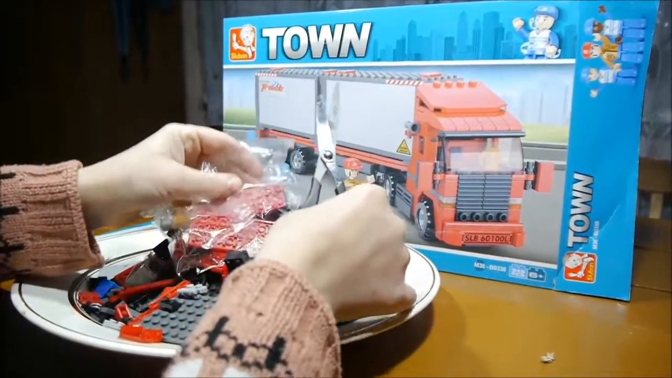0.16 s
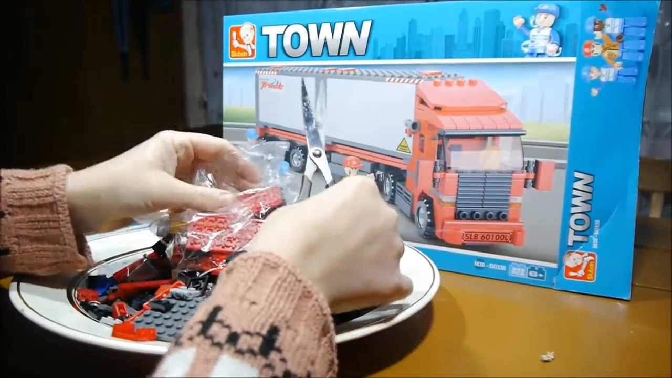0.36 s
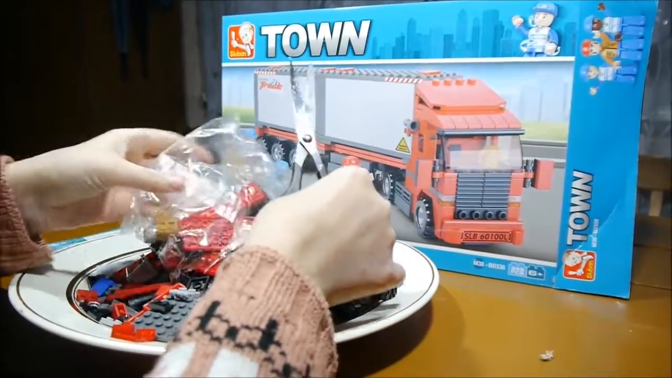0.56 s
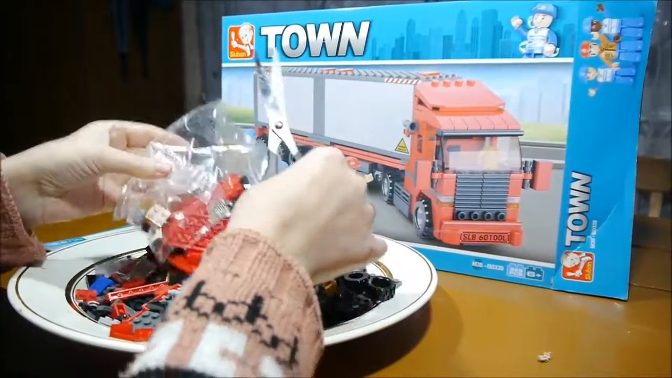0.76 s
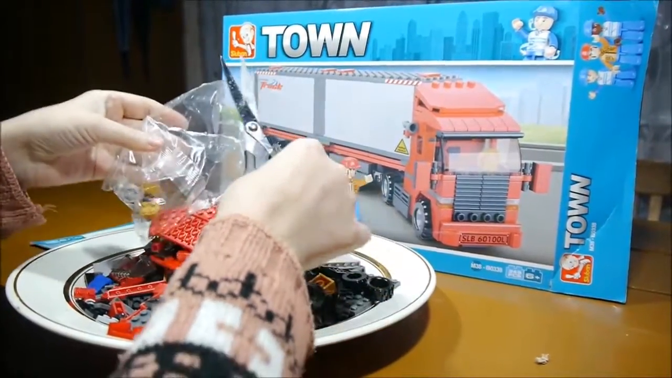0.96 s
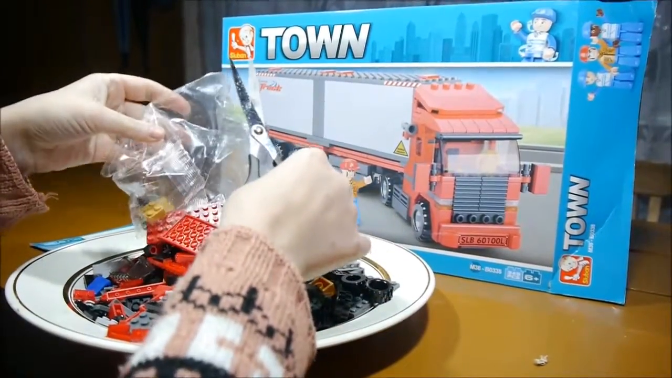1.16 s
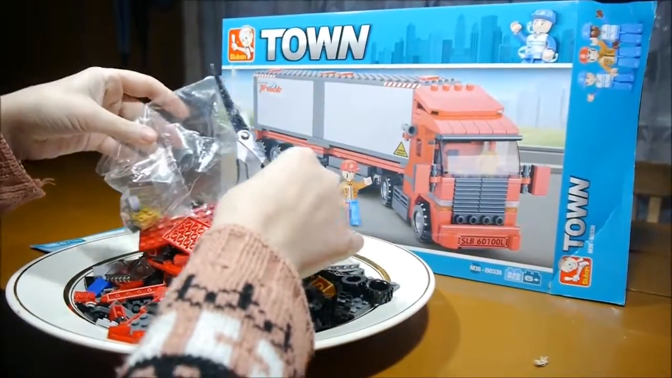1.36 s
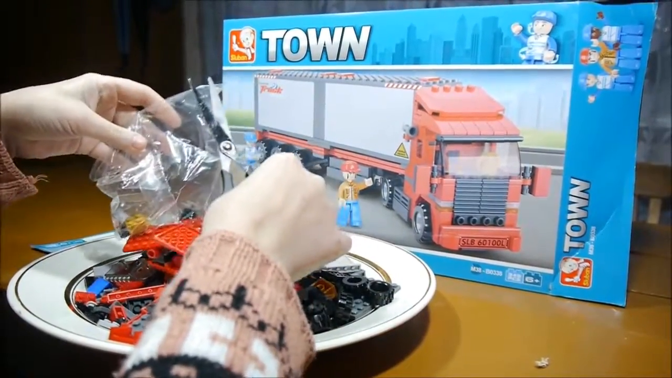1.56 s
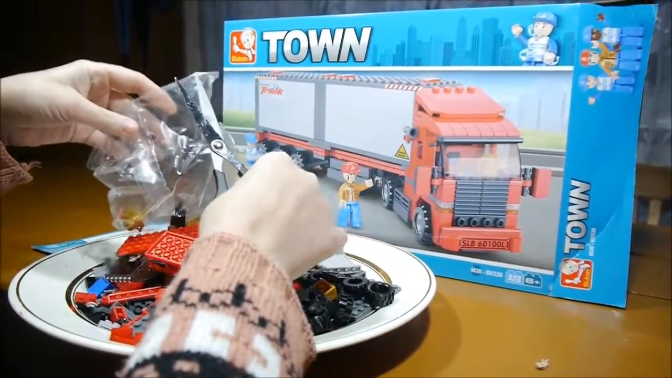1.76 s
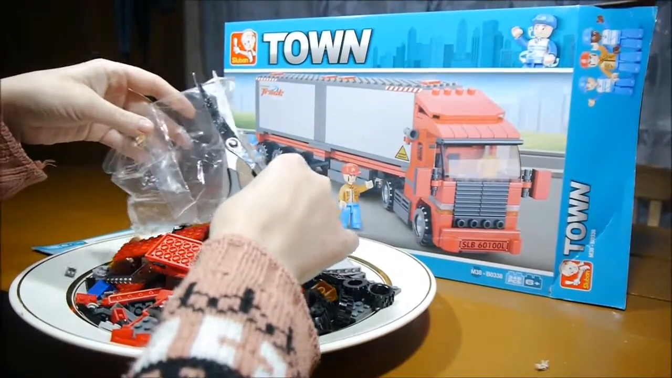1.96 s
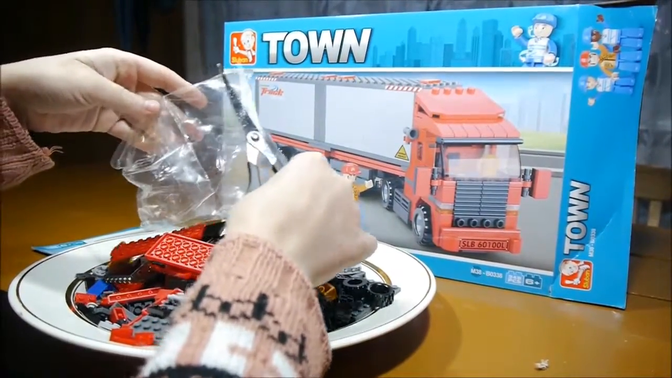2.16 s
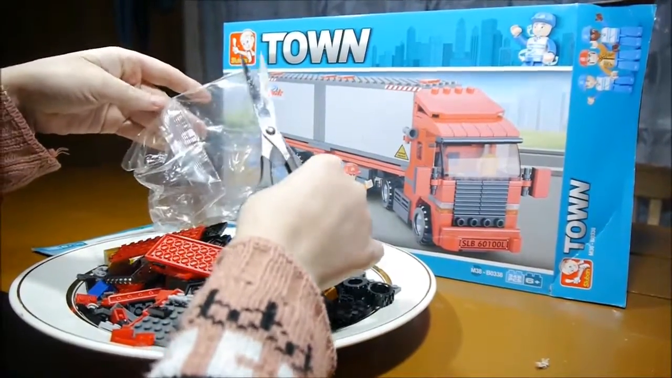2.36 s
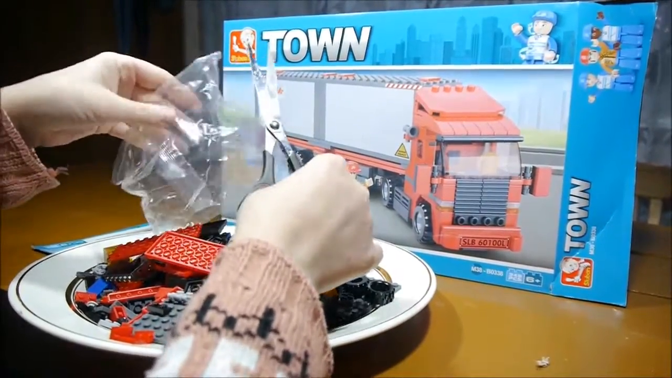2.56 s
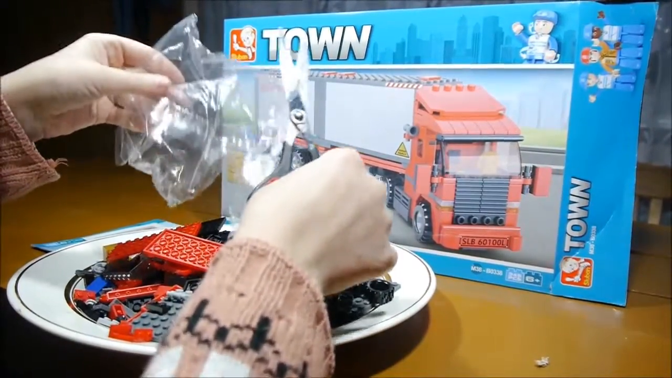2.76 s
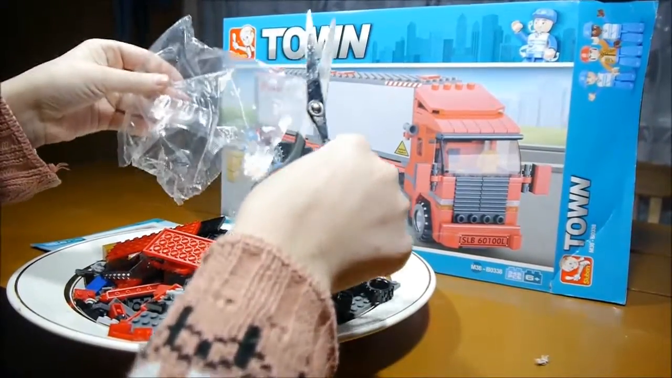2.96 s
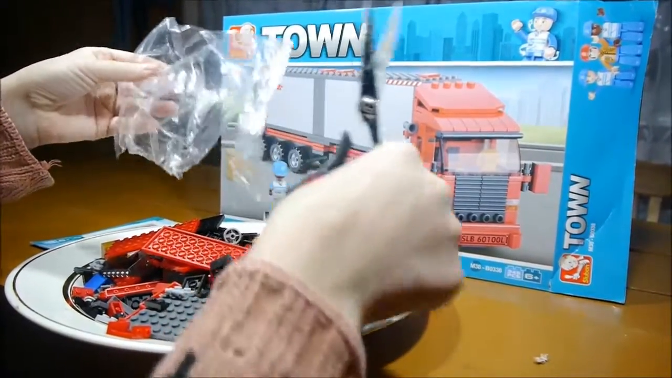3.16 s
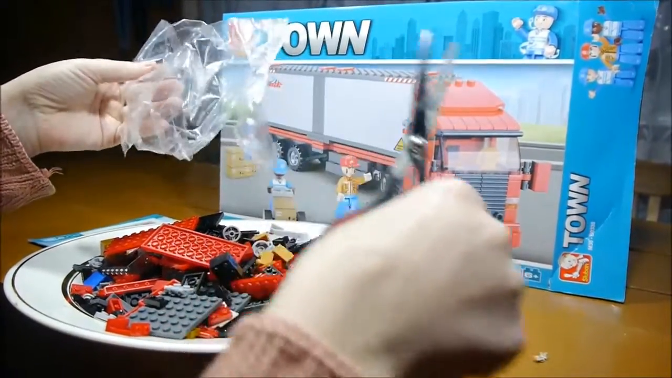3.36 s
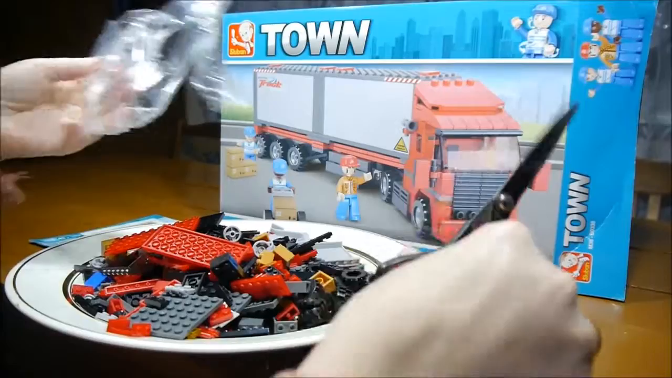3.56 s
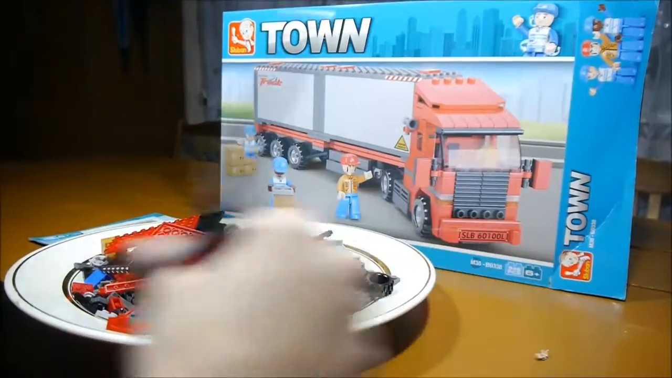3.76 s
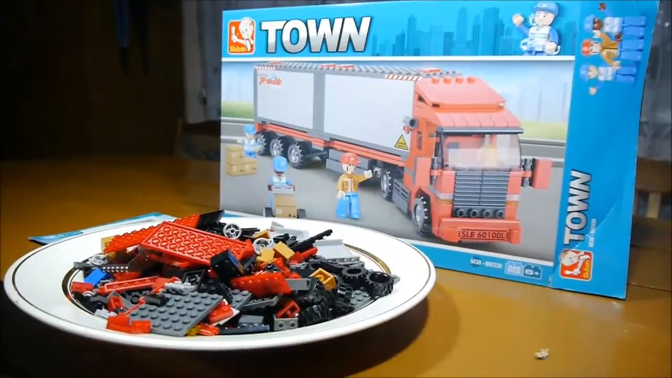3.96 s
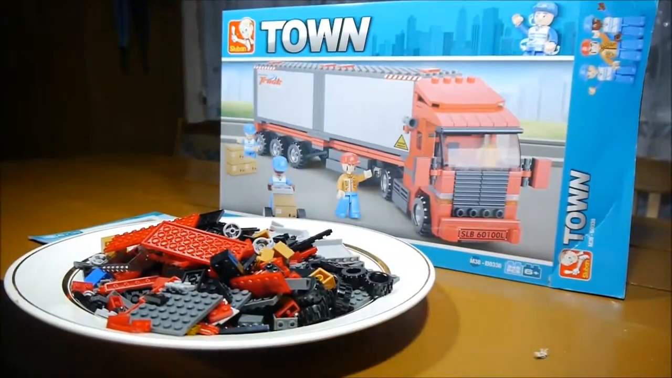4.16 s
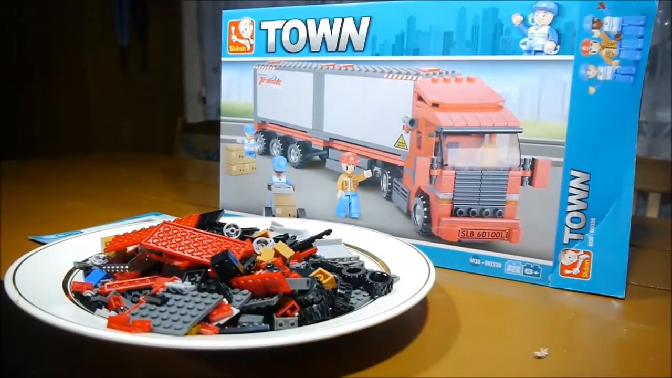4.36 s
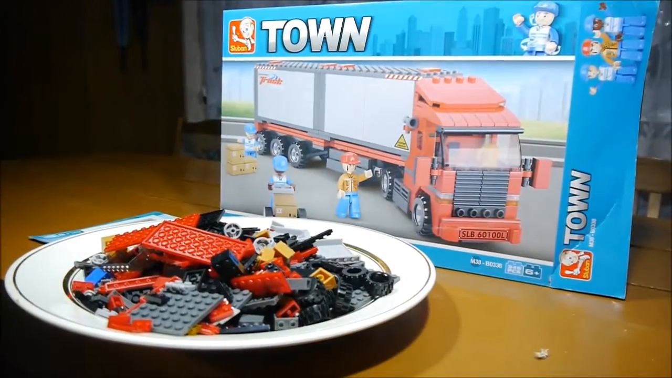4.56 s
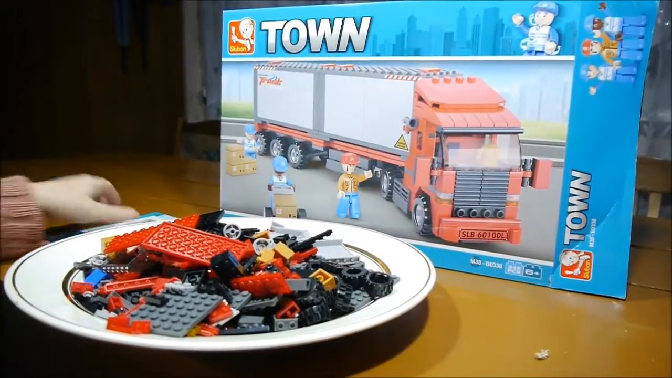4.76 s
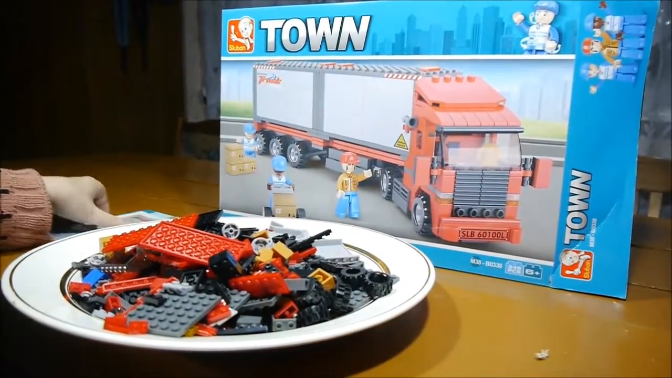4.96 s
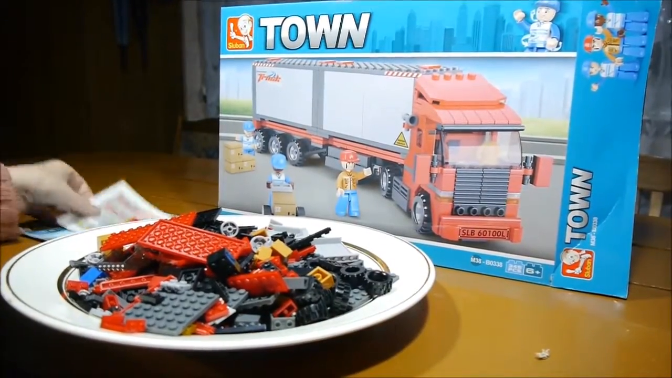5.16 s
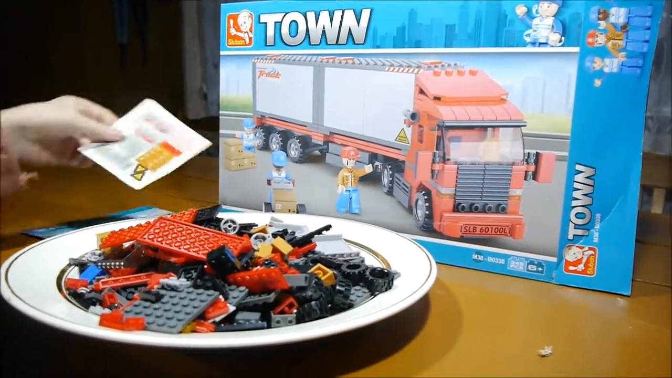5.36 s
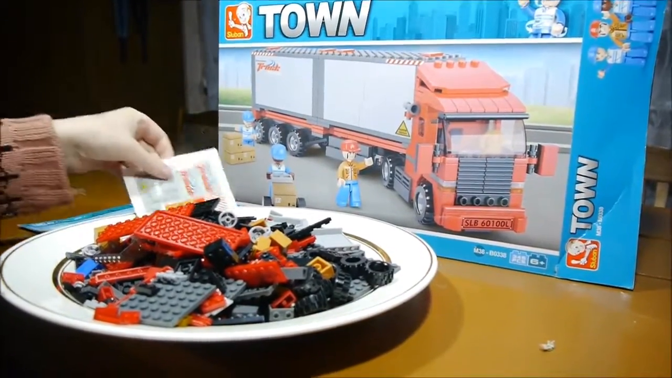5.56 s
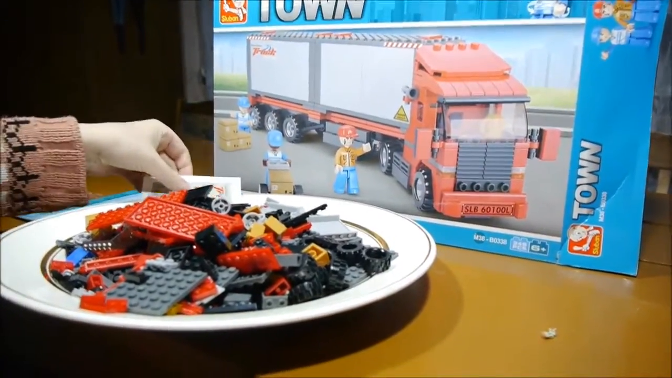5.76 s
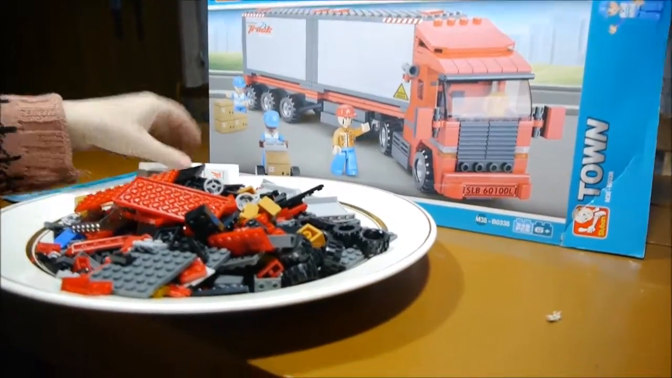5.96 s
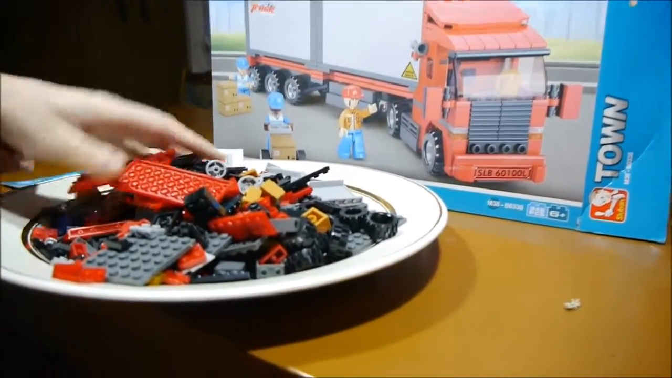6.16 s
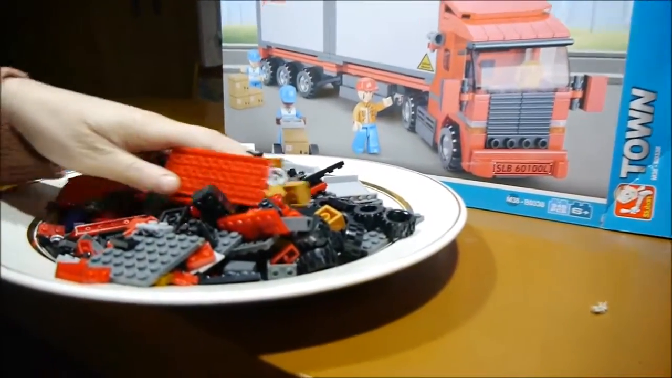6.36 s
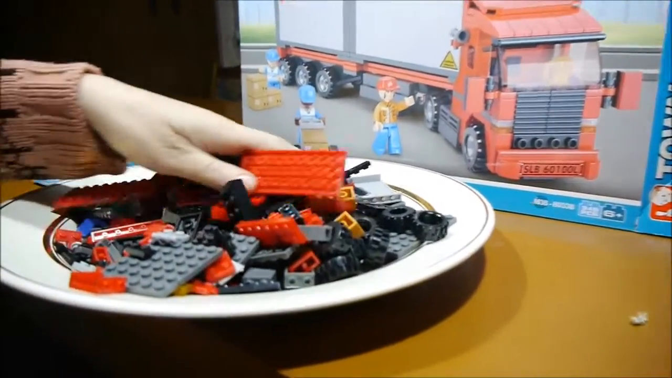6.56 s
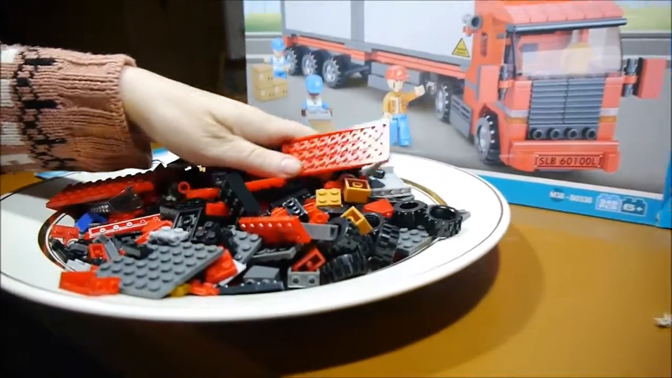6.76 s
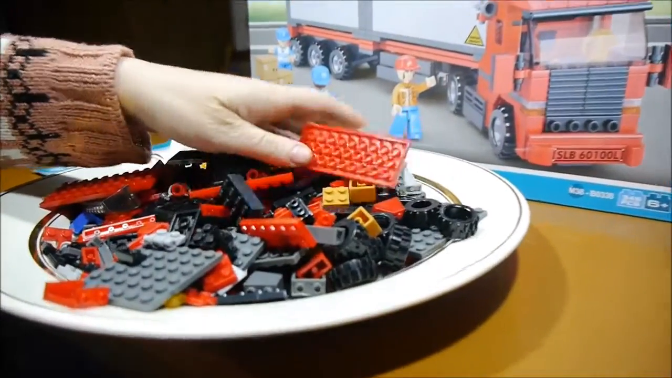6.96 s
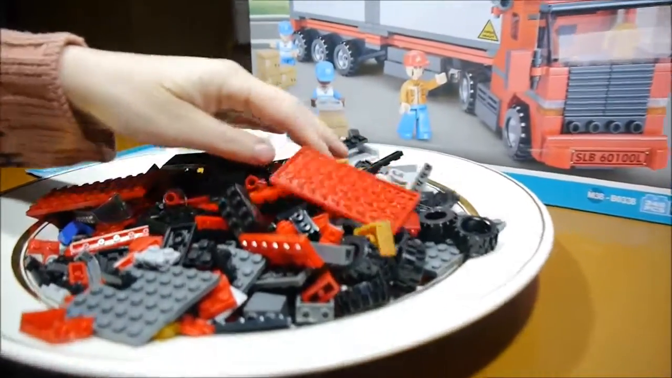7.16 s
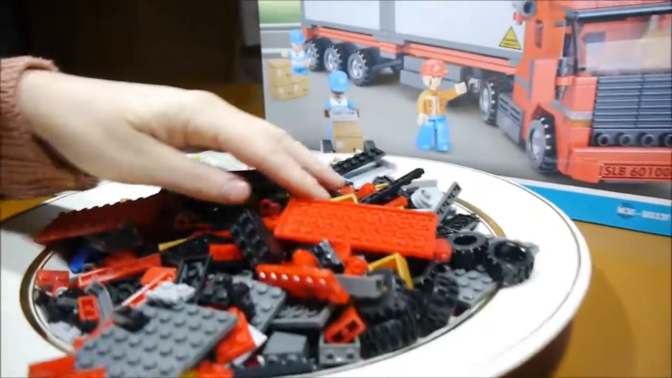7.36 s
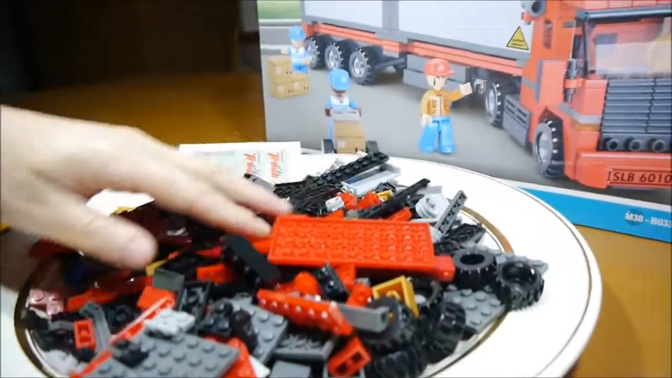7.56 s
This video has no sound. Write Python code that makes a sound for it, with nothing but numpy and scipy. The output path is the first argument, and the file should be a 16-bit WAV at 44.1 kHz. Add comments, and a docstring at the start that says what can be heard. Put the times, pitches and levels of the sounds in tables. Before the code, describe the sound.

Close stereo pickup in a small quiet room. Hard little plastic bricks tumble from a crinkly film bag onto a heap on a china plate, dense at first, then thinning. The empty bag is shaken with crisp snaps, crumpled and put away. After near silence come faint card touches and a tiny squeak, then a hand rakes loudly through the bricks.

```python
"""Plastic bricks pour from a crinkling bag onto a heap on a china plate, and the bag is shaken out, crumpled
and, after a pause, put away. A card is laid by the plate as a sleeve slides with a faint squeak, then the card
is handled again; last a hand rakes through the heap. Knocks are noise bursts with a short ring, clatter is
thousands of tiny rings, the squeak is narrow noise; plate modes, a film or card band, a small room's tail and a
soft hush surround them."""
import sys
import numpy as np
from scipy import signal
from scipy.fft import rfft, irfft, next_fast_len
from scipy.io import wavfile

SR = 44100
rng = np.random.default_rng(int(sys.argv[2]) if len(sys.argv) > 2 else 0)


def wav_out(sig):
    """Save sig, one row per channel (or a flat mono array), as 16-bit PCM at SR to the path in sys.argv[1]."""
    wavfile.write(sys.argv[1], SR, np.round(np.clip(np.atleast_2d(sig).T, -1, 1) * 32767).astype(np.int16))


N = 335160

# The clearest knocks and snaps; ring, body and edge are relative to the strike, before the layer trims:
# t/s, strike level/dB, ring f/Hz, ring level/dB, body level/dB, edge level/dB, left over right/dB
CLEAR_KNOCKS = [(0.012, -9.5, 1830, 1, -29, -15, -1), (0.028, -6, 2070, 4.5, -37, -1, 8),
                (0.073, -10, 3500, -8, -28, -8, -6), (0.08, -5, 2730, -3, -9.5, -5, 7),
                (0.092, -3, 985, -6, -19, -7, -1), (0.109, -11, 3270, -8, -22, -11, 0.0),
                (0.135, -7, 1630, -11, -20, -10, -2), (0.165, -12, 940, 2, -14, -6, -4),
                (0.187, -11, 627, 2, -29, -9, -5), (0.24, -7.5, 2310, 0, -20, -7, 0.0),
                (0.259, -5.5, 850, -4, -42, -2.5, 0.5), (0.283, -6, 2170, -6, -21.5, -10, 0.0),
                (0.359, -23, 1740, 11, -7, -26, -4), (0.383, -12.5, 2000, 2, -17, -14, 0.0),
                (0.407, -7, 1270, -1, -21.5, -12, -1), (0.444, -9.5, 3020, 0.5, -33, -15, 0.5),
                (0.471, -9.5, 3370, -1, -40, -22, 0.5), (0.502, -9, 930, -5, -12, -10, 0.5),
                (0.551, -4.5, 1120, -10, -16.5, -12, 4), (0.581, -9, 1390, -4, -24, -17, 2.5),
                (0.592, -7.5, 1860, -4, -33, -5, 7), (0.655, -15, 1920, 3, -32, -25, 0.0),
                (0.711, -12, 2210, 1, -28, -10, 1.0), (0.805, -18, 2500, -4, -32, 1, -4),
                (0.978, -7, 3600, -8, -22, -8, 0.5), (1.057, -9.5, 4900, -10, -24, -16, -1),
                (1.145, -5, 2580, -11, -32, -14, 3), (1.166, -17, 2620, -1, -11.5, -13, -1),
                (1.293, -31, 5350, -8, -10, -9, 1.5), (1.342, -10, 4800, -8, -24, -14, 1.5),
                (1.521, -22.5, 3920, 1, -11, -13, 1.5), (1.64, -13, 4200, -20, -43, -17, 6),
                (1.67, -12, 4020, -3, -17, -0.5, 4), (1.741, -27, 4830, -6, -30, -17, 2.5),
                (1.752, -5, 4830, -6.5, -33, -20, 11), (1.79, -13, 4660, -2, -35, 6, 8),
                (1.956, -9, 4800, -18, -40, -8, 4), (2.021, -9.5, 3100, -5, -17.5, -13, 1),
                (2.153, -12, 2180, 0, -15, 0, 11), (2.204, -4, 4440, -0.5, -26, -14, 14),
                (2.366, -34, 840, -2, -5.5, -25, 1.0), (2.43, -18, 2900, -10, -18, -5, 5),
                (2.546, -27, 1230, -7, -11, -16, 2.0), (2.566, -19.5, 483, -5, -6.5, -15, 4),
                (2.594, -10, 5600, -1, -34, 0, 1), (2.622, -8.5, 5130, -7, -17, -2, 6),
                (2.652, -9, 5700, -7, -16.5, -17, 7), (2.683, -15, 2300, -11, -13, -14, -5),
                (2.715, -7.5, 3140, -14, -20.5, -15, 3), (2.751, -15, 2150, -2, -28, -15, 3),
                (2.762, -2, 1466, -11, -22, -8, 9), (2.855, -22, 1540, -4, -19, -20, 0.5),
                (2.885, -22, 1500, -9, -21, -26.5, 2), (3.16, -10.5, 5660, -5, -44, 3, 10),
                (3.187, -17, 3040, -17, -33, -26, 3), (3.254, -25.5, 1740, -17, -29, -6, 3),
                (3.286, -22, 2770, -13, -35.5, -13.5, 5), (3.301, -15.5, 1360, -7.5, -17, -27, -3),
                (3.542, -29.5, 1930, 6, -5.5, -33, 5), (3.563, -16.5, 2360, -18, -45, -6, -2),
                (3.887, -25.5, 3440, -2, -8, -35, 14), (3.895, -8, 4700, -15, -21.5, -13, 11.5),
                (4.155, -42.5, 498, -3, 9, -32, 6), (4.246, -45, 650, -8, 14, -31, 3.5),
                (4.322, -26, 883, -12, -4, -11, 5), (4.879, -37, 481, 8, 7.5, -21.5, -5),
                (5.128, -38, 2130, 6, -2, -25, 1.5), (5.512, -20, 3244, 4, -35.5, -26, 10),
                (5.652, -23, 1240, -2, -22, -9, 4), (5.742, -25.5, 2130, 2, -19, -15, 2.5),
                (5.788, -20, 3200, -2, -31, -5, 3.5), (5.88, -45, 3370, 3, -28, -8, 4.0),
                (6.135, -8.5, 5400, 1.5, -27, -11, 4), (6.193, -7.5, 4840, -3, -50, -4, 1.0),
                (6.256, -10.5, 2750, 7.5, -49, -38, 11), (6.411, -9, 5950, -2, -45, -27, -2),
                (6.481, -1, 4190, -6, -49, -20, -1), (6.527, -4, 5730, -3, -37, -12, -6),
                (6.546, -4, 5810, 1, -45, -17, -0.5), (6.581, -17, 3330, -17, -44, 4.5, -14),
                (6.694, -5, 3240, -12, -53, -31, -2), (6.781, -4, 3330, -6, -43, -26, -3),
                (6.803, -4, 3350, 1, -55, -35, -3), (6.86, -13, 1850, 2, -42, -20, -3),
                (6.875, -12.5, 2620, 5, -46, -26, 2), (6.887, -4, 2940, 2, -47, -18, -7),
                (6.953, -19, 3700, -12, -40, -19, -5), (6.966, -18, 2080, -4, -38, -18, 0.0),
                (6.98, -29, 4630, -3, -46, -11, -3), (7.018, -11.5, 2070, -2, -43, -5, -11),
                (7.062, -6, 3420, -6, -37, -22, -0.5), (7.205, -24, 1900, 13, -34, -24, -4),
                (7.236, -9.5, 2530, 5, -37, -28, -6), (7.357, -15.5, 3570, 3, -35, -5, -2),
                (7.39, -10, 2300, -4, -56, -17, -3), (7.526, -13.5, 2590, 2, -40, 5, -1)]
# Dense clatter and rustle before the trim, one curve a gesture: pouring, shaking the bag out, crumpling it,
# putting it away, card, card again, raking: t/s, level/dB, treble over level/dB, bass over level/dB
CLATTER_CURVES = [
    [(0.0, -23, -7, -2), (0.08, -24.5, -5, -7), (0.236, -35.5, -2, -3), (0.24, -26, 3, -7),
     (0.338, -33, -5, -3), (0.48, -28, -4.5, -5.5), (0.788, -31, 1, -6), (0.814, -24.5, 4.5, -8),
     (1.028, -32, 0, -4.5), (1.542, -36.5, 0.5, -5), (1.6, -51, 2, -19)],
    [(1.6, -47.5, -4, -1), (1.784, -24, 7.5, -14.5), (1.938, -32.5, 4, -10), (1.966, -28, -4, -18),
     (2.144, -43, 6, -10), (2.154, -27.5, 5, 0), (2.178, -50, -11, -4), (2.196, -38, 0, -1),
     (2.206, -22.5, 1, -1.5), (2.222, -33.5, 2, -19), (2.4, -55.5, -17, 1)],
    [(2.4, -71, -15, -3), (2.436, -49.5, 7, 6), (2.492, -52, 0, -5), (2.586, -41.5, -8, 2),
     (2.592, -34, 12.5, -9), (2.646, -37.5, 5, -1), (2.746, -39.5, -11, -4.5), (2.766, -31, 6.5, 1),
     (2.772, -40.5, 3, 5.5), (2.922, -49, -9, -9), (3.1, -76.5, -2, -1)],
    [(3.75, -87, 5, 18), (3.872, -59, -17, -1), (3.892, -35.5, -12, -5), (3.966, -47.5, -9, -12),
     (4.116, -66, -11, 2), (4.176, -50.5, -12, 2), (4.296, -71, -15, 9), (4.334, -35, 0.5, -2.5),
     (4.398, -39.5, -12, -1), (4.54, -68, -16, 3), (4.6, -75, -7, 5)],
    [(4.75, -69, -7, -7), (4.754, -69, -5, 8), (4.898, -53.5, 0, 3.5), (4.924, -47.5, -0.5, -1),
     (5.038, -73, 2, 11.5), (5.048, -66, 3, -2), (5.122, -58, -1, -6), (5.128, -50.5, -11, 1.5),
     (5.164, -49.5, -7, -4), (5.244, -56.5, -1, -3), (5.35, -85, -1, -2)],
    [(5.45, -63, -13, -8), (5.5, -64, -15, 9), (5.512, -27.5, -22, -12), (5.574, -53, -14, 0.5),
     (5.67, -42, -6, -12.5), (5.722, -50, -21, -3.5), (5.806, -34, -0.5, -13), (5.856, -56, 4, 5),
     (5.884, -28, -11, -29), (5.894, -69, -6, -2), (6.0, -88, -21, 6)],
    [(6.1, -75, -3, -9), (6.136, -32.5, -4, -11), (6.228, -24.5, 1.5, -14), (6.47, -22.5, -1.5, -9.5),
     (6.492, -16.5, -1.5, -17.5), (6.65, -28, -0.5, -10), (6.688, -22.5, -5.5, -15.5),
     (7.26, -22, -3.5, -15), (7.31, -34.5, -7.5, -11), (7.524, -22, -2, -11.5), (7.6, -30.5, -6, -7)],
]
# What stays alike through each of those gestures:
# left over right/dB, plate level/dB, film or card level/dB, typical contact time/ms
GESTURE_TRAITS = [(2, -13.5, -18, 1.44), (1, -10.5, 1, 1.1), (-1.5, -5, -11, 0.84), (4.5, -2, -16, 0.94),
                  (2.5, -9, -16, 0.87), (3, -1.5, -14, 1.6), (0.5, -24, -31, 2.22)]
# Colour of the small collisions, shape only: f/Hz, level per Hz/dB
BRICK_COLOUR = [(88, -66), (150, -43.5), (291, -15.5), (475, -30), (702, -3), (1080, -12), (1260, 0.5),
                (1600, -8.5), (1790, -4), (3290, -3), (6910, -5.5), (10600, -2.5), (16000, -25)]
# Modes of the china plate, damped by the heap; each gesture sets the plate level on top: f/Hz, level/dB, t60/s
PLATE_MODES = [(1783, -48, .03), (3275, -48, .03), (4300, -48, .05), (4900, -45, .04), (5816, -49, .04),
               (8232, -45, .02), (9193, -46, .02), (10586, -41, .015)]
# A faint squeak: centre t/s, half length/s, f/Hz, half bandwidth/Hz, level/dB
SQUEAK_SETTING = (4.95, .035, 2950, 50, -54)
# Decay of the room: f/Hz, t60/s
WALL_DECAY = [(300, 0.23), (1000, 0.26), (3000, 0.21), (7000, 0.2), (14000, 0.16)]
# Colour of the still room air, shape only: f/Hz, level per Hz/dB
HUSH_COLOUR = [(15, -42), (25, -17.5), (270, -10), (394, -4.5), (516, -5), (677, 0.5), (936, -9),
               (1290, -8), (2280, -12), (4610, -16), (10400, -18.5), (14000, -23), (16000, -46)]
# Stereo width of noise and grains: f/Hz, side over mid level/dB
STEREO_WIDTH = [(60, -8), (150, -13), (380, -15), (950, -10), (2380, -5), (5980, -4), (15000, -2)]

BODY_HZ, FILM_HZ = (400, 1100), (4370, 5460)
BRICK_RING_T60_S = .013
CONTACT_SPREAD = 0.26   # spread of the natural log of contact time
LESSER_PER_S, LESSER_OVER_CLATTER_DB, LESSER_SPREAD_DB = 35, 9, 3
LESSER_RING_HZ, LESSER_RING_DB = (1200, 5500), -7
LESSER_BODY_DB, LESSER_EDGE_DB, LESSER_PAN_SPREAD_DB = -33, -14, 5
GRAINS_PER_S, GRAIN_SPREAD_DB = 10000, 3.7
GRAIN_CYCLES, GRAIN_RING_S = 20, .008   # a grain's t60 is this many cycles plus this time
CLATTER_TRIM_DB = -2.5
FIRST_ECHO_S, ROOM_DB = 0.0075, -3
HUSH_DB = -59.5   # centre of a drifting level
BASS_CUT_HZ, TOP_CUT_HZ = 90, 17000


def knocks(rows, contact_ms):
    """A short rough contact in three colours makes the struck piece ring briefly at its own pitch."""
    t = np.arange(1536) / SR
    draws = rng.standard_normal((len(rows), 2, len(t)))
    chance = rng.standard_normal(len(rows))
    # three channels each: left, right, towards the walls
    body, middle, edge, rings = np.zeros((4, 3, N + len(t)))
    for row, draw, longer in zip(rows, draws, chance):
        s, strike_db, ring_hz, ring_db, body_db, edge_db, pan_db = row
        start = round(s * SR)
        at = slice(start, start + len(t))
        tau = max(contact_ms[min(start, N - 1)], .2) * np.exp(CONTACT_SPREAD * longer) / 1000
        swell = t / tau * np.exp(1 - t / tau)   # the contact builds and fades
        rough = swell * draw
        luck = np.sqrt(np.mean(rough[0] ** 2) / np.mean(swell ** 2))   # evens out the noise's chance loudness
        mid, side = amp(strike_db) * rough / luck
        around = np.sqrt(np.sum(mid ** 2)) * (t == 0)   # summed over all directions the colour is even
        left, right = sides(pan_db)
        body[:, at] += amp(body_db) * np.array([mid, mid, around])   # bass reaches both sides alike
        middle[:, at] += [left * (mid + .3 * side), right * (mid - .3 * side), around]
        edge_spread = [left * (mid + 1.1 * side), right * (mid - 1.5 * side), around]
        edge[:, at] += amp(edge_db) * np.array(edge_spread)
        attack = amp(strike_db) * (1 - np.exp(-t / tau))
        decay = amp(ring_db - 60 * t / BRICK_RING_T60_S)
        struck_piece = attack * decay * np.sin(2 * np.pi * ring_hz * t)
        rings[:, at] += np.outer([np.sqrt(left), np.sqrt(right), .4], struck_piece)
    contact = amp(12) * band(body, *BODY_HZ)
    contact += amp(-8) * band(middle, 1250, 9600)
    contact += amp(-5) * band(edge, 6300, 12640)
    return (contact + rings)[:, :N]


def lesser_knocks(level_db):
    """Rows for smaller knocks at random moments, their strikes following the clatter level."""
    count = int(LESSER_PER_S * N / SR)
    when, pitch = rng.random((count, 2)).T
    size, place = rng.standard_normal((count, 2)).T
    strike_db = level_db[(when * N).astype(int)] + LESSER_OVER_CLATTER_DB + LESSER_SPREAD_DB * size
    low, high = LESSER_RING_HZ
    ring_hz = low * (high / low) ** pitch
    same = np.ones(count)
    return np.transpose([when * N / SR, strike_db, ring_hz, LESSER_RING_DB * same,
                         LESSER_BODY_DB * same, LESSER_EDGE_DB * same, LESSER_PAN_SPREAD_DB * place])


def clatter(dull_db, middle_db, bright_db, pan_db):
    """Countless small collisions and creases, in clumps; each rings briefly from a place of its own."""
    sizes = amp(GRAIN_SPREAD_DB * np.minimum(rng.exponential(1, N), 4))
    sizes *= rng.choice([-1, 1], N)
    sizes *= amp(2.5 * drift(90) + 1.5 * drift(30))   # clumps
    born = rng.random(N) < GRAINS_PER_S / SR
    pitches = np.linspace(17, 125, 88) ** 2
    dealt = rng.integers(0, 88, N)   # which pitch each grain gets
    places = rng.standard_normal(N)
    parts = np.zeros((3, 2, N))
    for k, hz in enumerate(pitches):
        clicks = sizes * born * (dealt == k)
        t60 = GRAIN_CYCLES / hz + GRAIN_RING_S
        mid, side = ring(np.array([clicks, clicks * places]), hz, t60)
        side = side * amp(at_hz(STEREO_WIDTH, hz))
        even = np.sqrt(np.sqrt(hz) / t60)   # evens out pitch spacing and ring length
        colour = even * amp(at_hz(BRICK_COLOUR, hz))
        part = int(hz > 1500) + int(hz > 6000)
        parts[part] += colour * np.array([mid + side, mid - side])
    dull = rms_one(parts[0])
    middle = rms_one(band(parts[1], 900, 9000))
    bright = rms_one(band(parts[2], 4000, 18000))
    panned = sides(pan_db) * (amp(middle_db) * middle + amp(bright_db) * bright)
    both = amp(dull_db) * dull + panned
    return amp(CLATTER_TRIM_DB) * np.vstack([both, both.mean(axis=0)])


def gestures():
    """Dull, middle and bright clatter levels, near silent between gestures, then the traits of each gesture."""
    t = np.arange(N) / SR
    out = np.zeros((7, N))
    out[:3] = -120
    for rows, traits in zip(CLATTER_CURVES, GESTURE_TRAITS):
        s, level_db, treble_db, bass_db = np.transpose(rows)
        on = (t >= s[0]) & (t <= s[-1])
        level = np.interp(t[on], s, level_db)
        dull = level + np.interp(t[on], s, bass_db)
        bright = level + np.interp(t[on], s, treble_db)
        out[:3, on] = [dull, level, bright]
        out[3:, t >= s[0]] = np.reshape(traits, (-1, 1))   # held until the next gesture
    return out


def plate(blows):
    """The plate under the heap rings along in its modes."""
    return sum(amp(db) * ring(blows, hz, t60) for hz, db, t60 in PLATE_MODES)


def film_or_card(blows):
    """The stiff film or card answers the blows in one treble band."""
    return band(blows, *FILM_HZ)


def squeak():
    """A short narrow band of noise that swells and fades."""
    s, half_s, hz, half_width_hz, db = SQUEAK_SETTING
    swell = np.exp(-((np.arange(N) / SR - s) / half_s) ** 2)
    tone = band(rng.standard_normal(N), hz - half_width_hz, hz + half_width_hz)
    return amp(db) * swell * rms_one(tone)


def room(x):
    """Walls return a diffuse tail, faint before the first echo, that dies band by band."""
    t = np.arange(SR // 2) / SR
    noise = stereo_noise(len(t), lambda hz: 0 * hz)
    edges = np.geomspace(100, 18000, 9)
    tail = 0
    for low, high in zip(edges, edges[1:]):
        t60 = at_hz(WALL_DECAY, np.sqrt(low * high))
        tail = tail + band(noise, low, high) * amp(-60 * t / t60)
    tail = tail * (amp(-14) + np.clip((t - FIRST_ECHO_S) / .002, 0, 1))
    tail = tail / np.sqrt(np.sum(tail ** 2) / 2)   # unit energy a side
    return amp(ROOM_DB) * signal.fftconvolve(x[None], tail, axes=1)[:, :N]


def hush():
    """Still room air: coloured stereo noise whose level drifts slightly."""
    level = amp(HUSH_DB + 1.0 * drift(3.7))
    air = stereo_noise(next_fast_len(N), lambda hz: at_hz(HUSH_COLOUR, hz))[:, :N]
    return level * rms_one(air)


def amp(db):
    """Decibels to gain."""
    return 10 ** (np.asarray(db) / 20)


def rms_one(x):
    """Scaled to rms 1."""
    return x / np.sqrt(np.mean(x ** 2) + 1e-20)


def at_hz(points, hz):
    """Second column of a table, read on a log-frequency axis."""
    table = np.array(points)
    return np.interp(np.log(hz), np.log(table[:, 0]), table[:, 1])


def drift(rate):
    """Straight lines between random knots of spread 1, rate knots a second."""
    knots = rng.standard_normal(int(N / SR * rate) + 2)
    return np.interp(np.arange(N) / SR * rate, np.arange(len(knots)), knots)


def ring(clicks, hz, t60):
    """A damped resonator: a unit click sets a sine of starting height 1 ringing."""
    r = amp(-60 / (t60 * SR))
    w = 2 * np.pi * hz / SR
    return signal.lfilter([0, np.sin(w)], [1, -2 * r * np.cos(w), r * r], clicks + 1e-18)


def band(x, low_hz, high_hz):
    """Butterworth band-pass."""
    sos = signal.butter(2, [low_hz, high_hz], "band", fs=SR, output="sos")
    return signal.sosfilt(sos, x + 1e-18)


def stereo_noise(size, gain_db):
    """Noise with a level per frequency; the two sides differ most in the treble."""
    hz = np.maximum(np.arange(size // 2 + 1) * SR / size, 10)
    mid, side = rfft(rng.standard_normal((2, size))) * amp(gain_db(hz))
    side = side * amp(at_hz(STEREO_WIDTH, hz))
    return irfft(np.array([mid + side, mid - side]), size)


def sides(pan_db):
    """Left and right gains."""
    return amp(np.array([pan_db / 2, -pan_db / 2]))


def scene():
    """Knocks and clatter excite the plate and the film or card; squeak, room and hush join them."""
    dull_db, middle_db, bright_db, pan_db, plate_db, film_db, contact_ms = gestures()
    rows = np.vstack([CLEAR_KNOCKS, lesser_knocks(middle_db)])
    blows = knocks(rows, contact_ms) + clatter(dull_db, middle_db, bright_db, pan_db)
    answers = plate(amp(plate_db) * blows) + film_or_card(amp(film_db) * blows)
    no_bass = signal.butter(3, 300, "high", fs=SR, output="sos")   # small pieces radiate no bass
    sound = signal.sosfilt(no_bass, blows + answers) + squeak()
    air = hush()
    return sound[:2] + room(sound[2]) + air


def record(dry):
    """Close-set microphones hear the bass more alike; peaks past full scale clip, deep bass and top are cut."""
    mid, side = (dry[0] + dry[1]) / 2, (dry[0] - dry[1]) / 2
    shelf = signal.bilinear([1, 2 * np.pi * 500], [1, 2 * np.pi * 1300], SR)   # narrows the bass
    side = signal.lfilter(*shelf, side)
    clipped = np.clip([mid + side, mid - side], -1, 1)
    bass_cut = signal.butter(2, BASS_CUT_HZ, "high", fs=SR, output="sos")
    top_cut = signal.cheby2(12, 70, TOP_CUT_HZ, fs=SR, output="sos")
    return signal.sosfilt(top_cut, signal.sosfilt(bass_cut, clipped))


dry = scene()
out = record(dry)
wav_out(out)
```